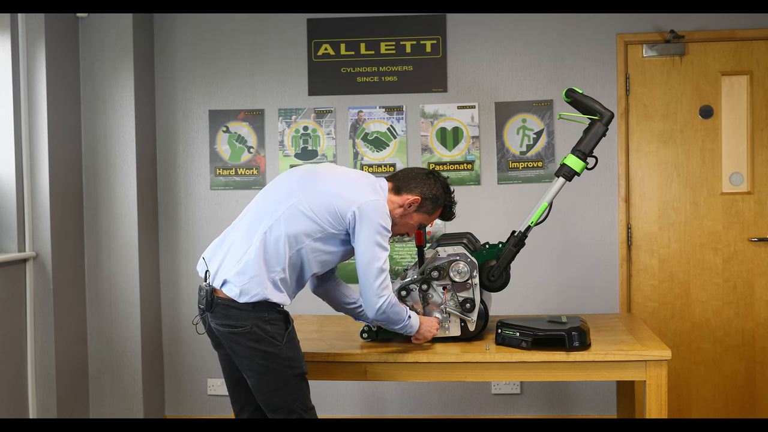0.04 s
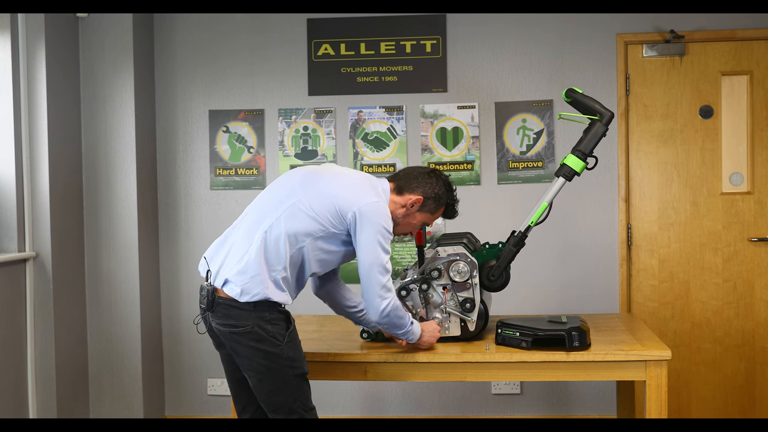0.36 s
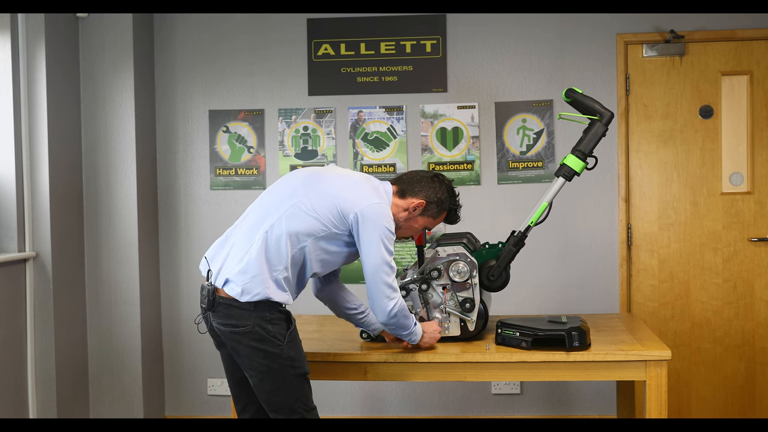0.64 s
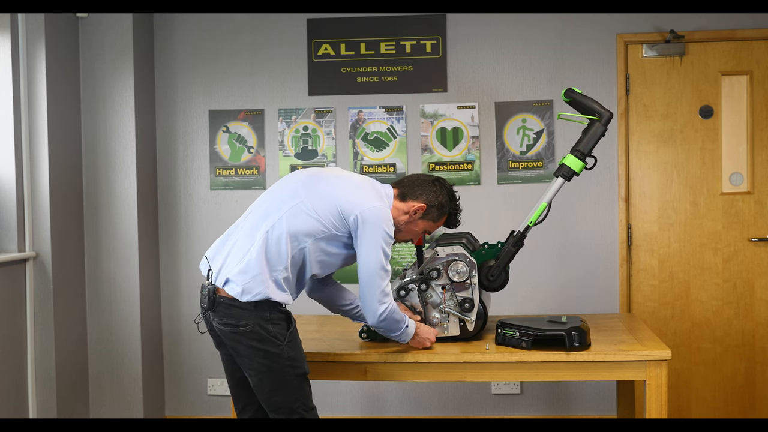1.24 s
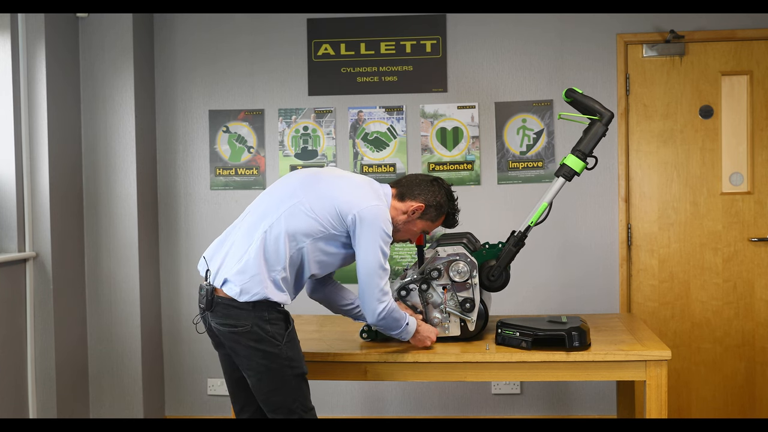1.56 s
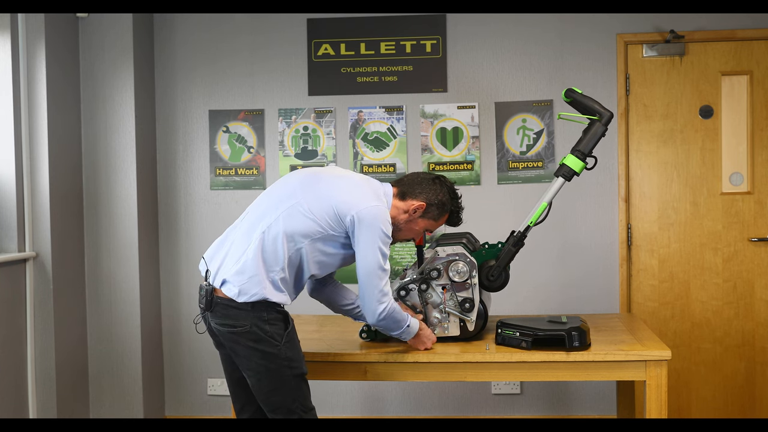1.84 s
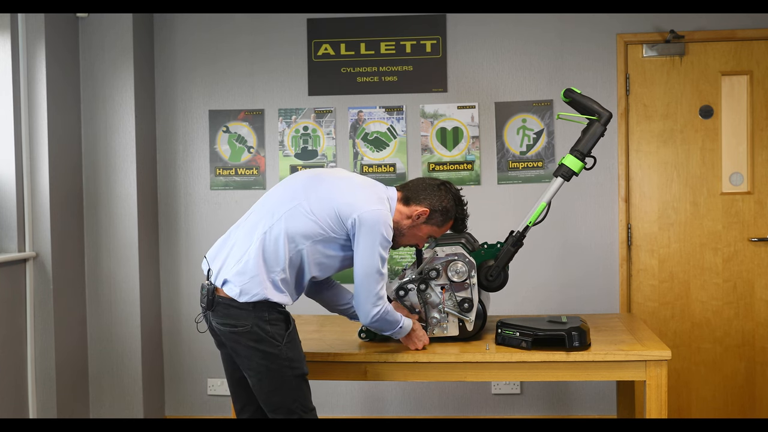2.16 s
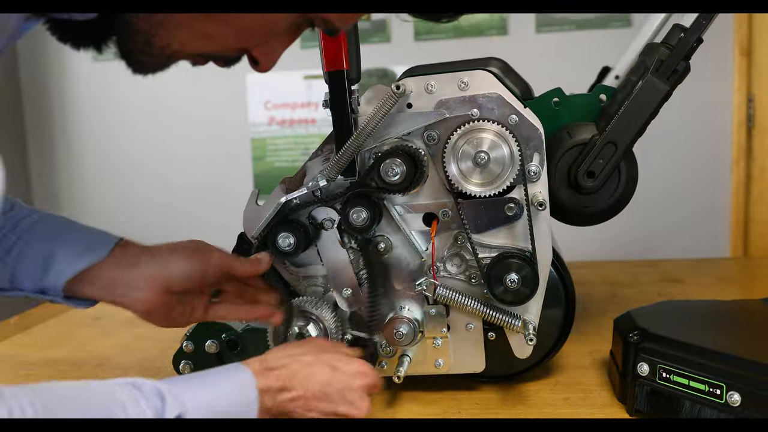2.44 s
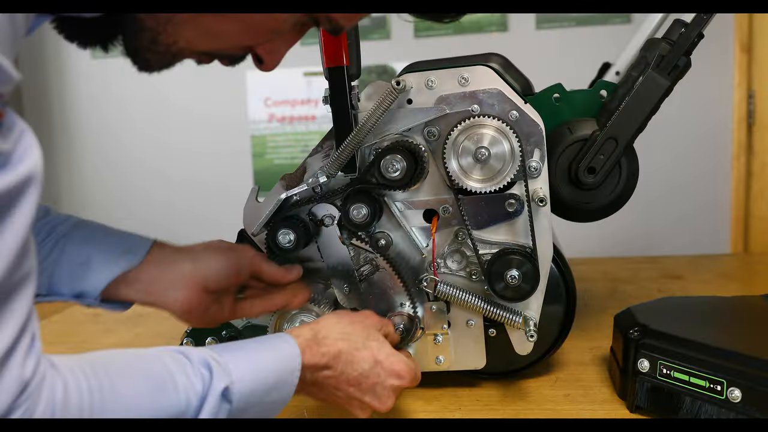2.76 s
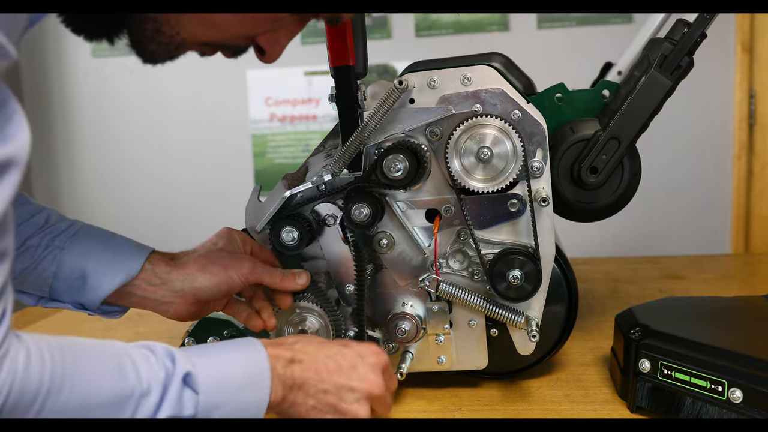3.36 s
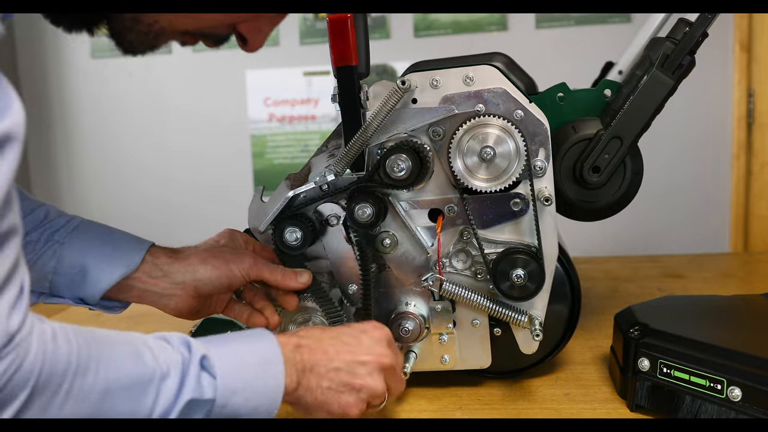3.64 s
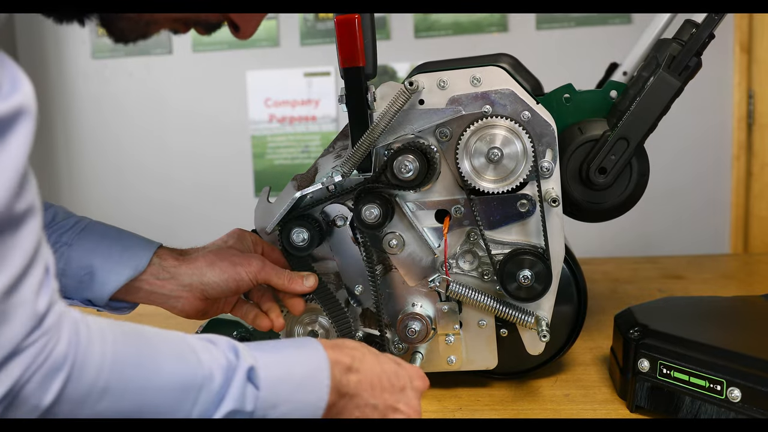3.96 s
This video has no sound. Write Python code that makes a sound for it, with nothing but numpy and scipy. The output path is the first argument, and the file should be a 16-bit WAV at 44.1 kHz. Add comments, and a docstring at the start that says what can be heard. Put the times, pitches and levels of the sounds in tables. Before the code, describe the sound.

A metal part snaps into a mower's frame with one loud, ringing clack. Before it come light clicks, dull knocks and faint sleeve rubbing as hands work at a wooden table in a quiet room.

```python
"""A quiet room: a mower stands on a wooden table while a part is worked into its metal side frame by hand.
Fingers and sleeves rub over a low rumble and mains hum. Metal slides and clicks, small parts ping,
and dull knocks pass through frame and table. At 3.2 s the part snaps home with one loud, rattling
clack that thumps the table and leaves the steel ringing."""
import sys
import numpy as np
from scipy import signal
from scipy.fft import rfft, irfft
from scipy.io import wavfile
from scipy.ndimage import map_coordinates

SR = 44100
rng = np.random.default_rng(int(sys.argv[2]) if len(sys.argv) > 2 else 0)


def unload_wav(signal):
    """Save mono or channel-first audio to the path in sys.argv[1] as 16-bit WAV at rate SR, clipped to [-1, 1]."""
    wavfile.write(
        sys.argv[1],
        SR,
        np.round(np.clip(np.atleast_2d(signal).T, -1, 1) * 32767).astype(np.int16),
    )


N = 176400
T = np.arange(SR) / SR  # time within one event, s
TOP_HZ = 15830

# building rumble spectrum: freq_hz, gain_db
RUMBLE_COLOUR = [(20, -8), (35, -11.5), (50, 1), (68, -5), (98, 5.5), (130, -5), (200, -14.5), (500, -19.5),
                 (1000, -30.5), (2500, -39), (8000, -40.5), (15500, -43.5)]
# room decay: freq_hz, t60_s
ROOM_DECAY = [(60, 0.96), (170, 0.6), (500, 0.71), (1200, 0.29), (3500, 0.33), (8000, 0.22), (15000, 0.26)]
# sleeve and finger rub envelope: time_s, level_db
RUB_LEVELS = [(0, -83.5), (.12, -64.5), (.2, -65), (.36, -61), (.47, -74), (.53, -70), (.85, -75),
              (.98, -72.5), (1.05, -66.5), (1.2, -75.5), (1.35, -77), (1.6, -77.5), (1.8, -77.5),
              (2.05, -75.5), (2.25, -77), (2.4, -70), (2.68, -67), (2.87, -68.5), (4, -66.5)]
# rub spectrum: freq_hz, gain_db
RUB_COLOUR = [(200, 21.5), (1200, 7), (2200, 2.5), (3600, -3.5), (4900, 0.5), (6000, -10), (7000, -1.5),
              (7700, -8.5), (8600, -2), (12000, -3.5), (15500, -7)]
# soft sleeve strokes: centre_s, length_s, level_db
SLEEVE_STROKES = [(.67, .5, -81.5), (1.5, 0.65, -79)]
# sleeve stroke spectrum: freq_hz, gain_db
SLEEVE_COLOUR = [(1000, -8), (2300, -3), (3500, -8), (4800, 2), (5900, -8), (6900, 2), (7700, -4),
                 (8600, 4), (9600, -3), (11000, -2), (15000, -18)]
# metal-on-metal slides: centre_s, length_s, level_db
METAL_SLIDES = [(.15, 0.16, -80.5), (.3, .26, -74), (1.044, 0.14, -72)]
# slide spectrum: freq_hz, gain_db
SLIDE_COLOUR = [(300, -10), (1700, -6), (2200, 3), (2800, -8), (4500, -8), (5100, 6), (5600, 4),
                (6200, -10), (8500, -7), (15000, -15)]
# loose washer touches: start_s, level_db, t60_s, damped_after_s
WASHER_TOUCHES = [(.51, -66, .3, .06), (.914, -71, .6, .12), (2.364, -74, .6, .07), (2.594, -64, 1.1, .25),
                  (2.965, -71, .4, .06)]
# small ringing parts: start_s, pitch_hz, level_db, t60_s, waver_rad
PINGS = [(.182, 5070, -55, 0.094, 3.5), (.219, 6740, -52.5, 0.028, 2.3), (.34, 2070, -67, 0.047, 1.7),
         (.912, 5340, -65, 0.054, 2.5), (2.368, 635, -53.5, 0.24, 0.76), (2.367, 2200, -57.5, .09, 4.7),
         (2.368, 1610, -59.5, 0.074, 3.1), (2.5957, 2300, -49.5, 0.037, 2.1),
         (2.964, 1970, -44.5, 0.036, 0.65), (2.965, 2600, -54, 0.086, 1.2), (3.765, 1310, -46.5, .2, 1.8)]
# light metal clicks: start_s, level_db, tilt_db_per_octave, t60_s
CLICKS = [(0.1812, -40.5, -5, 0.016), (.1955, -50, -4.5, 0.062), (.219, -46.5, -5, 0.027),
          (.2325, -57, 0, 0.016), (.258, -66, 3, .02), (0.2844, -48.5, -7, 0.018), (0.297, -54, -6, 0.079),
          (0.307, -43, -7.5, 0.018), (.3095, -45, -6.5, 0.017), (0.3396, -44, -3, 0.037),
          (.374, -56, 7, 0.012), (0.385, -46, -7.5, 0.024), (0.419, -68, 3, .02), (0.516, -66, 2, 0.02),
          (.647, -60, 15, 0.019), (0.848, -63, -4, 0.025), (0.858, -63.5, 2, 0.018), (.912, -68.5, 1, 0.1),
          (.968, -67, -2, .015), (1.035, -71, 1, .04), (1.047, -57, -7, 0.041), (1.0588, -63, 0, 0.022),
          (1.071, -62.5, -1, .03), (1.404, -65, -5, 0.035), (2.01, -60, 10.5, 0.075), (2.368, -64, 4, 0.09),
          (2.4592, -61.5, -1, .02), (2.537, -60, 8, 0.062), (2.5962, -48, 3, 0.022), (2.612, -64, -1, 0.14),
          (2.655, -64.5, 0, 0.097), (2.708, -60, 6.5, 0.11), (2.92, -48, -10.5, 0.027),
          (2.963, -50, 2, 0.023), (3.074, -61.5, -2, 0.04), (3.144, -58.5, -5, 0.01),
          (3.4097, -46, -0.5, 0.015), (3.674, -57.5, 0, .02), (3.682, -53.5, 0, 0.017),
          (3.704, -59, -2, .025), (3.7651, -45.5, -6, 0.04)]
# click spectrum: freq_hz, gain_db
CLICK_COLOUR = [(100, -11.5), (900, -18), (1600, -3.5), (2400, 0.5), (3900, -4.5), (5200, -2.5), (6100, -7),
                (7800, -5.5), (10000, -8.5), (15500, -13.5)]
# dull knocks: start_s, level_db, tilt_db_per_octave, t60_s, table_gain_db
KNOCKS = [(.143, -60.5, 1, 0.39, -20), (.186, -42, 1, 0.16, 0), (0.2, -39, -5.5, 0.15, 4),
          (.293, -48, 1.5, 0.26, -4), (0.34, -47.5, -6.5, 0.24, -12), (.384, -51, 4, 0.34, 4.5),
          (.498, -63, 3, 0.27, -34), (.857, -49.5, -1, 0.1, -13), (.917, -67, 3, 0.21, -11),
          (.965, -55.5, -4, 0.13, 0), (1.057, -57, 5.5, .2, -14), (1.096, -56, 0.5, 0.049, -18),
          (1.401, -63.5, 3, 0.24, -19), (1.52, -58.5, 1, 0.22, -4), (1.75, -67, 6, 0.11, -12),
          (2.006, -65, 7.5, 0.21, -15), (2.162, -65, 4, 0.1, -4), (2.368, -54.5, -8, 0.31, 3),
          (2.458, -50, -3, 0.1, 2), (2.54, -46.5, -12.5, 0.05, -14), (2.597, -48, -2.5, 0.17, -19),
          (2.625, -42.5, -8, 0.18, -3), (2.9232, -44.5, 0.5, 0.19, 1.5), (2.9645, -35, -1, 0.16, 7),
          (2.9695, -49.5, 4, 0.19, 10.5), (3.076, -47, -17, 0.12, -3), (3.585, -42.5, -3.5, 0.072, -9),
          (3.686, -43.5, -2, 0.26, -25), (3.766, -44, -8.5, 0.077, -17), (3.919, -57.5, -8, 0.099, -12)]
# knock spectrum: freq_hz, gain_db
KNOCK_COLOUR = [(40, -25), (150, -6.5), (300, -9), (500, 3.5), (700, -2.5), (950, -6), (1300, -13),
                (1700, -27.5), (2500, -31.5), (4500, -47.5), (15000, -98)]
# table top modes: pitch_hz, gain_db, t60_s
TABLE_MODES = [(473.6, 1.5, 0.12), (603, -17.5, .16), (758, -16, .1)]
# metal frame modes: pitch_hz, gain_db, t60_s
FRAME_MODES = [(170, -8, .6), (250, -10, .3), (336, -11, .35), (397, -7, .38), (462, -4, .35),
               (497, -5, .36), (577, -9, .3), (641, -6, .22), (810, 3, .17), (890, -1, .15), (961, -5, .21),
               (1445, -3, .1), (1687, -12, .17), (1960, -4, .14), (2210, -3, .17), (2483, -6, .28),
               (2734, -6, .18), (3364, -5, .16), (3623, -5, .15), (7004, -3, .15), (7865, -10, .2),
               (8216, 1, .12), (9883, -8, .15)]
# long-ringing modes of the steel part: pitch_hz, gain_db, t60_s
STEEL_MODES = [(1109, -7, .8), (1241, -4, .9), (2009, 3, .65), (2279, -10, 1.5), (3740, -6, .7),
               (3837, -6, .75), (9358, -15, 1), (10187, -15, 1.2), (11929, -17, 1.1), (13259, -14, 1),
               (14082, -15, 1.2), (14357, -14, 1.1), (14920, -18, 1.3), (15198, -10, 1.1)]
# spectrum of the spring and gear modes: freq_hz, gain_db
SHIMMER_COLOUR = [(1000, 7), (2300, 0.5), (3000, -1.5), (3900, 3.5), (5500, -5.5), (7000, 0.5),
                  (10000, -0.5), (12500, -6), (14000, -0.5), (15500, 1)]
# contacts within the clack: start_s, level_db, t60_s, tilt_db_per_octave
CLACK_CONTACTS = [(3.1937, -38.5, 0.063, -5), (3.1987, -23.5, 0.02, -2), (3.2076, -17, 0.049, -1.5),
                  (3.2114, -16.5, 0.032, 2.5), (3.2158, -15, 0.042, 8.2), (3.2183, -19, 0.045, 0.5),
                  (3.2281, -21.5, 0.066, 2)]
# clack contact spectrum: freq_hz, gain_db
CLACK_COLOUR = [(40, -17.5), (150, -1.5), (400, -6.5), (850, -2.5), (1150, -6.5), (1450, 2.5), (2400, -1.5),
                (3700, -0.5), (5200, -6.5), (7000, -4), (10000, -5.5), (12500, -8), (15500, -13)]
# clack reverb spectrum: freq_hz, gain_db
CLACK_TAIL_COLOUR = [(40, -1.5), (160, 3.5), (450, 0), (850, 1.5), (1150, 1), (2300, -1), (3800, -1.5),
                     (5200, -3), (8000, -1.5), (11500, -9.5), (15500, -12.5)]


def amp(db):
    """dB to linear gain."""
    return 10 ** (np.asarray(db) / 20)


def unit_rms(x):
    """Scale to rms 1."""
    return x / np.sqrt(np.mean(x ** 2) + 1e-20)


def curve_at(points, hz):
    """Interpolate (freq_hz, value) points on a log frequency axis."""
    freqs_hz, values = np.transpose(points)
    return np.interp(np.log(hz + 1), np.log(freqs_hz + 1), values)


def add(track, start_s, sound):
    """Mix a sound into the track in place."""
    span = track[round(start_s * SR):][:len(sound)]
    span += sound[:len(span)]


def noise(colour, size, tilt_db_per_octave=0):
    """Coloured noise of rms 1, tilted above 200 Hz."""
    hz = np.fft.rfftfreq(size, 1 / SR)
    gain = amp(curve_at(colour, hz) + tilt_db_per_octave * np.log2(np.maximum(hz, 200)))
    return unit_rms(irfft(rfft(rng.standard_normal(size)) * gain, size))


def decay(t60_s):
    """Exponential decay."""
    return np.exp(-np.log(1000) * T / t60_s)


def rise(tau_s):
    """Exponential attack."""
    return 1 - np.exp(-T / tau_s)


def burst(colour, tilt_db_per_octave, t60_s):
    """Dense, damped vibration of one contact, with the energy of its envelope."""
    envelope = decay(t60_s)
    vibration = noise(colour, SR, tilt_db_per_octave) * envelope
    return vibration * np.linalg.norm(envelope) / np.linalg.norm(vibration)


def ring(modes, waver_rad=0, waver_per_s=59):
    """Damped sines with random, wavering phase."""
    knots_s = np.arange(300) / waver_per_s
    out = np.zeros(SR)
    for hz, db, t60_s in modes:
        phase_rad = 2 * np.pi * (hz * T + rng.random())
        drift = np.interp(T, knots_s, rng.standard_normal(len(knots_s)))
        out += amp(db) * decay(t60_s) * np.sin(phase_rad + waver_rad * drift)
    return out


def room_tone(rumble_db=-62.5, hum_db=-70.5, hum_hz=100):
    """Building rumble and mains hum."""
    hum = np.sin(2 * np.pi * hum_hz * np.arange(N) / SR)
    return amp(rumble_db) * noise(RUMBLE_COLOUR, N) + amp(hum_db) * hum


def reverb(colour, tilt_db_per_octave=0):
    """Diffuse room tail of a contact; treble dies first."""
    hz, time_s, bands = signal.stft(noise(colour, SR, tilt_db_per_octave), SR, nperseg=256)
    bands *= np.exp(-np.log(1000) * time_s / curve_at(ROOM_DECAY, hz)[:, None])
    return signal.istft(bands, SR)[1][:SR] * rise(tau_s=.018)


def rubbing(rough_db=1.5, grips_per_s=90):
    """Faint, uneven friction of sleeves and fingers."""
    time_s = np.arange(N) / SR
    grip = map_coordinates(rng.standard_normal(600), [time_s * grips_per_s], mode="wrap")
    level_db = np.interp(time_s, *np.transpose(RUB_LEVELS)) + rough_db * grip
    return amp(level_db) * noise(RUB_COLOUR, N)


def friction(strokes, colour, rough_db, slips_per_s=91):
    """Surfaces drag in tiny slips that excite their resonances."""
    out = np.zeros(N)
    for centre_s, length_s, db in strokes:
        slips = np.interp(T, np.arange(600) / slips_per_s, rng.standard_normal(600))
        swell = np.sin(np.pi * np.minimum(T / length_s, 1))
        add(out, centre_s - length_s / 2, swell * amp(db + rough_db * slips) * noise(colour, SR))
    return out


def washer(pitch_hz=11150, damping_s=.015):
    """A loose washer rings until a finger damps it."""
    out = np.zeros(N)
    for start_s, db, t60_s, damped_after_s in WASHER_TOUCHES:
        tone = ring([(pitch_hz, db, t60_s)], waver_rad=.35)
        finger = np.exp(-np.maximum(T - damped_after_s, 0) / damping_s)
        add(out, start_s, tone * rise(tau_s=.008) * finger)
    return out


def pings():
    """Small parts ring after a touch, one mode each."""
    out = np.zeros(N)
    for start_s, hz, db, t60_s, waver_rad in PINGS:
        add(out, start_s, ring([(hz, db, t60_s)], waver_rad, waver_per_s=330))
    return out


def clicks(reverb_db=-18):
    """Metal edges tick against each other."""
    out = np.zeros(N)
    for start_s, db, tilt_db_per_octave, t60_s in CLICKS:
        tick = burst(CLICK_COLOUR, tilt_db_per_octave, t60_s)
        tail = amp(reverb_db) * reverb(CLICK_COLOUR, tilt_db_per_octave)
        add(out, start_s, amp(db) * (tick + tail))
    return out


def knocks(reverb_db=-6.5):
    """The part bumps the frame; the table top resonates."""
    out = np.zeros(N)
    for start_s, db, tilt_db_per_octave, t60_s, table_gain_db in KNOCKS:
        bump = burst(KNOCK_COLOUR, tilt_db_per_octave, t60_s) * rise(tau_s=.001)
        table = amp(table_gain_db) * ring(TABLE_MODES) * rise(tau_s=.0037)
        tail = amp(reverb_db) * reverb(KNOCK_COLOUR, tilt_db_per_octave)
        add(out, start_s, amp(db) * (bump + table + tail))
    return out


def shimmer(group_db=-53.5, mid_t60_s=.96):
    """Many weak spring and gear modes, in three decay groups."""
    out = np.zeros(SR)
    for t60_ratio in (.6, 1, 1.4):
        spectrum = np.zeros(SR // 2 + 1, complex)  # 1 Hz bins
        hz = rng.integers(1000, TOP_HZ, size=100)
        phase_rad = 2 * np.pi * rng.random(len(hz))
        spectrum[hz] = amp(curve_at(SHIMMER_COLOUR, hz)) * np.exp(1j * phase_rad)
        out += unit_rms(irfft(spectrum)) * decay(mid_t60_s * t60_ratio)
    return amp(group_db) * out


def clack(seat_s=3.2085, frame_db=-26, steel_db=-47, reverb_db=-24, thump_db=-18.5, thump_hz=53):
    """The part catches and rattles home; frame and steel ring, the table thumps."""
    out = np.zeros(N)
    for start_s, db, t60_s, tilt_db_per_octave in CLACK_CONTACTS:
        add(out, start_s, amp(db) * burst(CLACK_COLOUR, tilt_db_per_octave, t60_s))
    frame = amp(frame_db) * ring(FRAME_MODES, waver_rad=.35)
    steel = amp(steel_db) * ring(STEEL_MODES, waver_rad=.1)
    metal = (frame + steel + shimmer()) * rise(tau_s=.002)
    thump = amp(thump_db) * np.sin(2 * np.pi * thump_hz * T) * decay(t60_s=.091) * rise(tau_s=.0018)
    tail = amp(reverb_db) * reverb(CLACK_TAIL_COLOUR)
    add(out, seat_s, metal + thump + tail)
    return out


def scene():
    """Mono mix of all sources."""
    slides = friction(METAL_SLIDES, SLIDE_COLOUR, rough_db=2.5)
    sleeves = friction(SLEEVE_STROKES, SLEEVE_COLOUR, rough_db=1.5)
    contacts = clack() + knocks() + clicks() + pings() + washer()
    background = rubbing() + room_tone()
    return (background + sleeves + slides + contacts)[None]


def record(dry):
    """Steep low-pass at TOP_HZ."""
    hz = np.fft.rfftfreq(2 * N, 1 / SR)
    return irfft(rfft(dry, 2 * N) / (1 + (hz / TOP_HZ) ** 200))[:, :N]


dry = scene()
out = record(dry)
unload_wav(out)
```